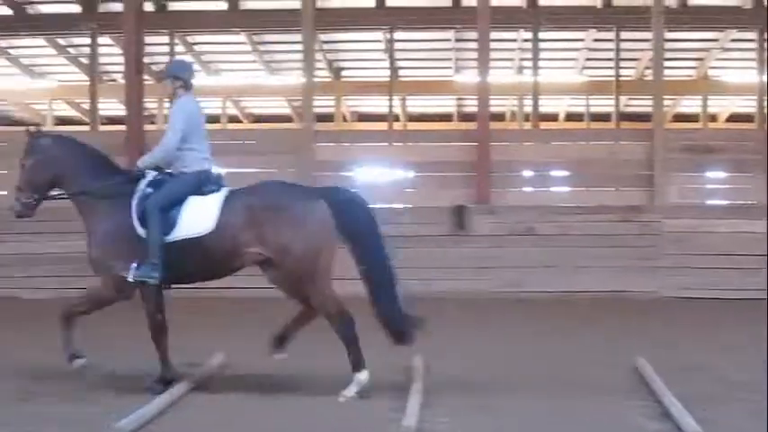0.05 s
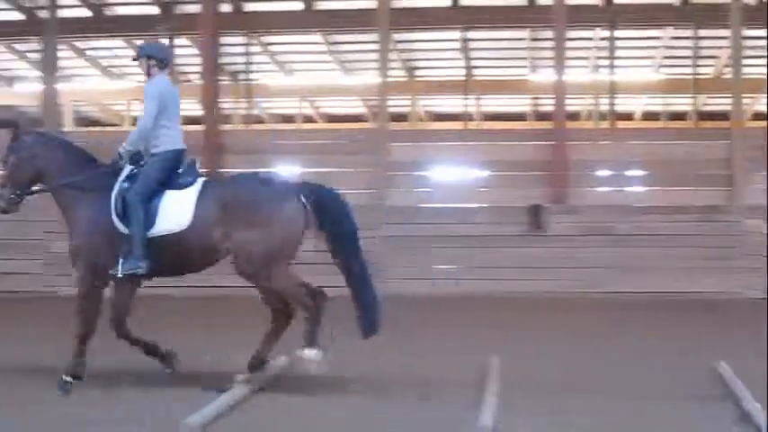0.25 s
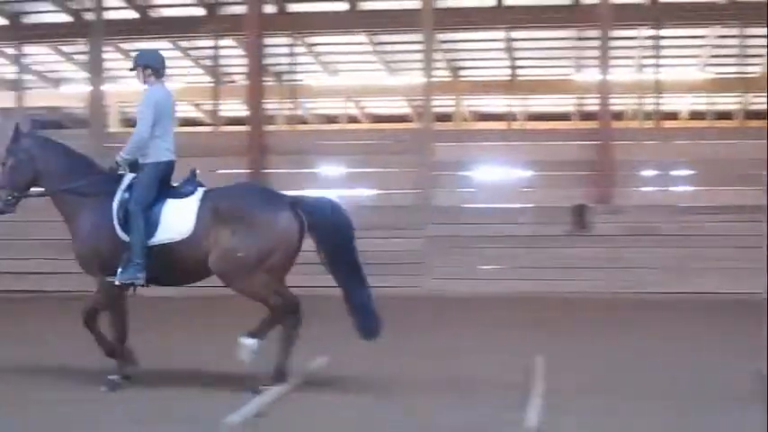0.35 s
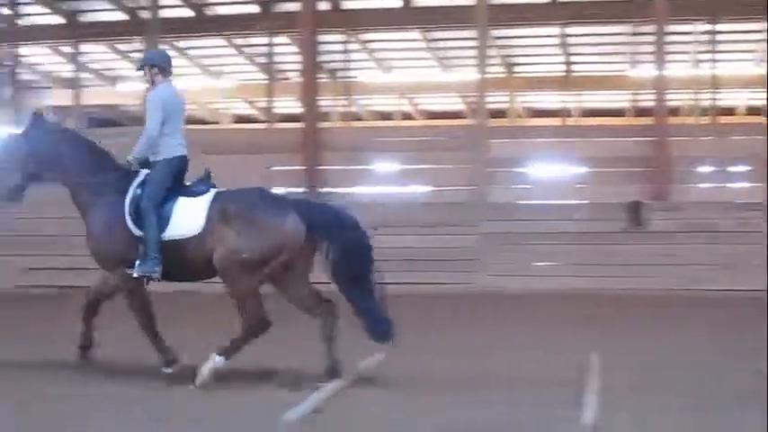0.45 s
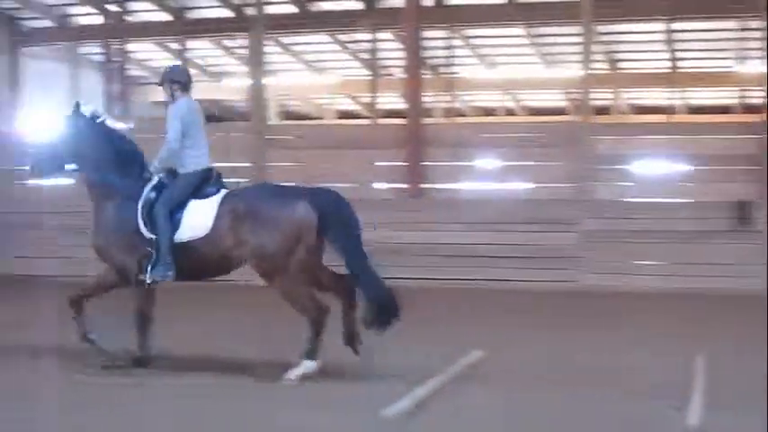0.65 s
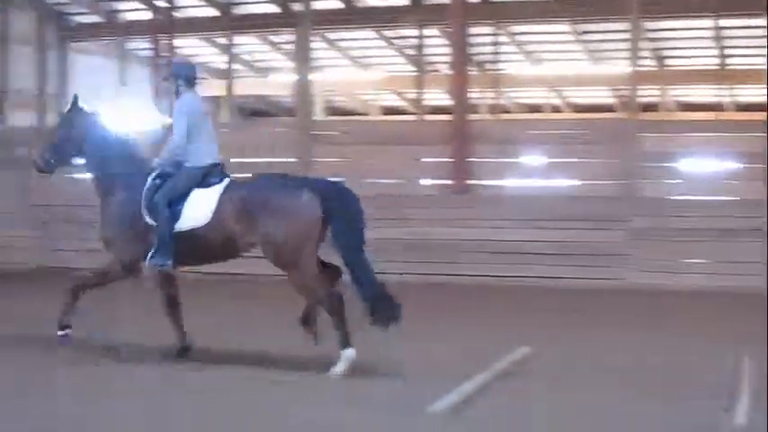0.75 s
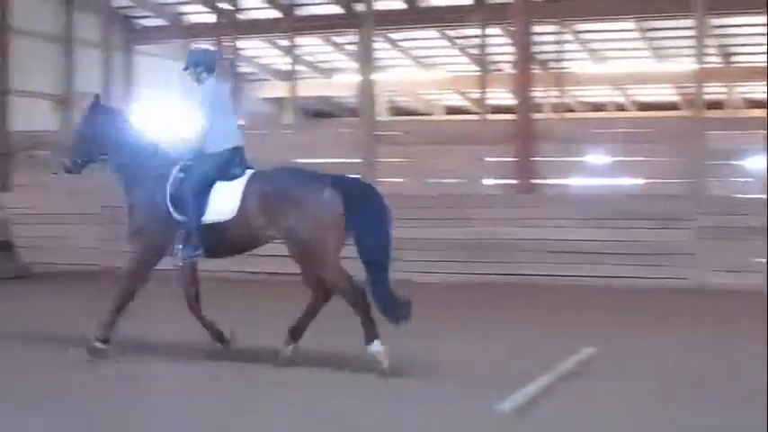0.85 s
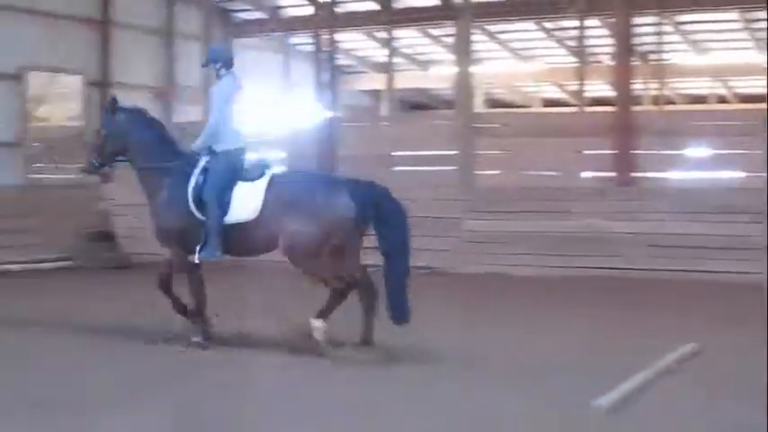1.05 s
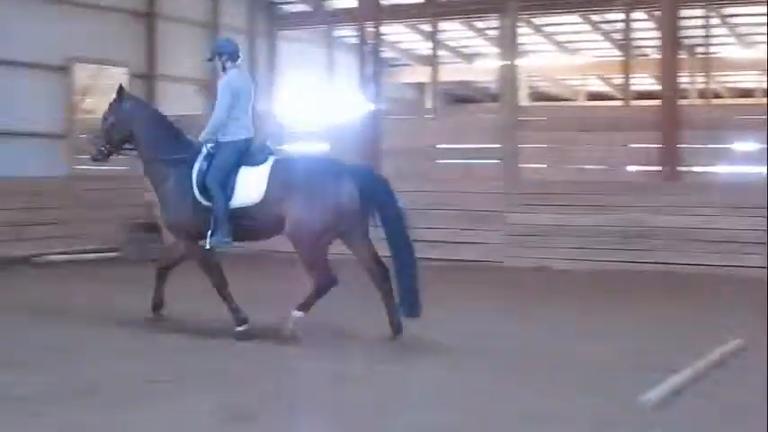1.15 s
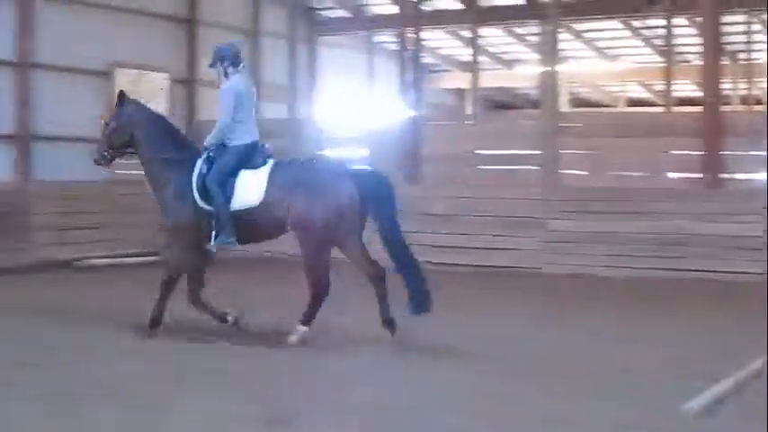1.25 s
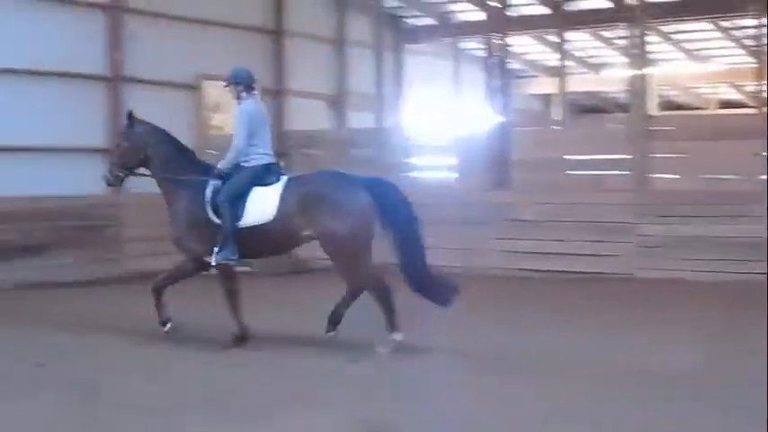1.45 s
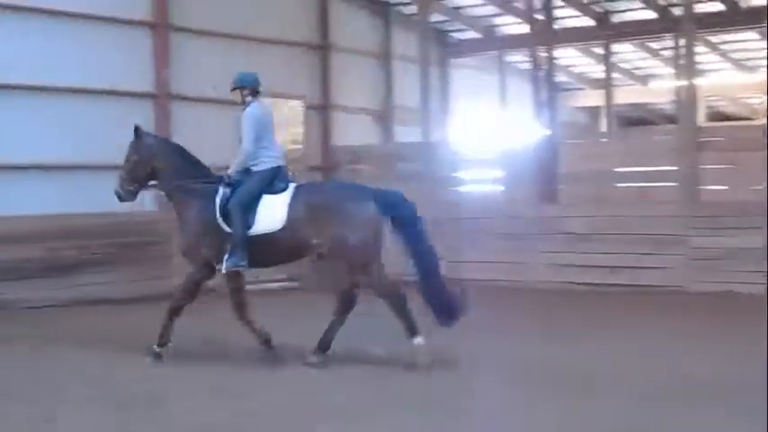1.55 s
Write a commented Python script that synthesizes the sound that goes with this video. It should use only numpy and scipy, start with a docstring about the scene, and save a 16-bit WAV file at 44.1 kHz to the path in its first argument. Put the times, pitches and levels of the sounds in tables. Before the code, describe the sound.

A hoof thuds and cracks against a wooden pole indoors, among dull steps in sand.

```python
"""A wooden thud and crack: a trotting horse knocks a ground pole in an indoor arena.
The impact excites the pole's modes; it bounces, rocks to rest, and its notes hang in the hall.
Soft footfalls and scuffs of sand, both bursts of noise, follow over a low hum,
faint room noise and distant, smeared squeaks."""
import sys
import numpy as np
from scipy import signal
from scipy.fft import rfft, irfft
from scipy.io import wavfile

SR = 44100
rng = np.random.default_rng(int(sys.argv[2]) if len(sys.argv) > 2 else 0)


def file_out(sig):
    """Save sig as 16-bit WAV at sys.argv[1]."""
    # one column per channel
    cols = np.atleast_2d(sig).T
    # limit, then scale
    lim = np.clip(cols, -1, 1)
    pcm = np.round(lim * 32767).astype(np.int16)
    wavfile.write(sys.argv[1], SR, pcm)


N = 70560

# blows on the pole: start_s, thud_db, ring_db
POLE_BLOWS = [(.2418, -9, -26.5), (0.2488, -9.5, -31.5), (0.2645, -16, -29.5), (0.2747, -20, -32),
              (0.3154, -12.5, -35.5)]


def undb(db):
    """Amplitude ratio of a level in decibels."""
    return 10 ** (np.asarray(db) / 20)


def fade(start_s, t60_s, rise_s):
    """Damped envelope: a rise, then exponential decay by 60 dB in t60_s."""
    age = np.maximum(np.arange(N) / SR - start_s, 0)
    return (1 - np.exp(-age / rise_s)) * np.exp(-np.log(1000) * age / t60_s)


def unit_rms(x):
    """The signal scaled to an rms of 1."""
    return x / np.sqrt(np.mean(x ** 2))


def noise(gain):
    """Random-phase noise of rms 1 whose amplitude spectrum follows gain(hz)."""
    f = np.maximum(np.fft.rfftfreq(N, 1 / SR), 1)
    phases = np.exp(2j * np.pi * rng.random(len(f)))
    return unit_rms(irfft(gain(f) * phases, N))


def band(hz, width_hz):
    """Noise shaped by a steep resonance."""
    return noise(lambda f: 1 / (1 + ((f * f - hz * hz) / (f * width_hz)) ** 2))


def drift(rate_hz):
    """Slow random fluctuation: low-pass noise of rms 1."""
    return noise(lambda f: np.exp(-(f / rate_hz) ** 2))


def background():
    """The building's broadband noise, and hum tones under slow amplitude and phase modulation."""
    # room noise spectrum: frequency_hz, relative_density_db
    air_spectrum = [(15, -42.5), (25, -11.5), (53, -21.5), (76, -5.5), (109, -10.5), (235, -3.5),
                    (424, -14), (485, -20), (569, -12.5), (1260, -16.5), (1470, -22.5), (4570, -28.5),
                    (5600, -34.5), (7280, -73), (12300, -120)]
    # tones of the hum: pitch_hz, level_db
    hum_tones = [(85, -43.5), (128.5, -51.5), (242, -55)]
    t = np.arange(N) / SR
    air_hz, air_db = np.array(air_spectrum).T
    air = noise(lambda f: undb(np.interp(np.log(f), np.log(air_hz), air_db)))
    out = air * undb(-38 + 0.83 * drift(11))
    for hz, db in hum_tones:
        amplitude = np.sqrt(2) * undb(db - 0.73 * drift(4.6))
        out += amplitude * np.sin(2 * np.pi * hz * t + 0.51 * drift(3.8))
    return out


def squeaks():
    """Reverberation blurs far-off high notes into narrow noise bands with decaying tails."""
    # distant squeaks: start_s, length_s, pitch_hz, level_db
    notes = [(-.03, 0.046, 1148, -42), (0.028, .06, 1180, -53.5), (0.625, 0.073, 1320, -41.5),
             (0.77, 0.12, 1205, -43), (1.008, 0.027, 1230, -37.5), (1.075, 0.041, 1224, -40),
             (1.203, 0.039, 1260, -49), (1.325, 0.038, 1203, -46.5)]
    t, out = np.arange(N) / SR, 0
    t60_s = 0.69
    for start, length, hz, db in notes:
        swell = np.clip((t - start) / (length / 2), 0, 1)
        tail = np.exp(-np.log(1000) * np.maximum(t - start - length, 0) / t60_s)
        out += undb(db) * swell * tail * band(hz, width_hz=99)
    return out


def hall(x):
    """Reverberation: a diffuse field builds up and dies away, each band at its own rate."""
    # arena reverberation: centre_hz, relative_db, t60_s
    bands = [(70, -14, 0.7), (140, -7, 1.9), (293, -0.5, 1.3), (530, -0.5, 2.16), (895, -4, 1.83),
             (1600, -4, 1.84), (2960, -8, 1.3), (6100, -9.5, 0.35)]
    log_f = np.log(np.maximum(np.fft.rfftfreq(N, 1 / SR), 1))
    log_centres = np.log([row[0] for row in bands])
    white = rfft(rng.standard_normal(N))
    response, wet_db = 0, 1
    for share, (_, db, t60) in zip(np.eye(len(bands)), bands):
        echoes = irfft(white * np.interp(log_f, log_centres, share), N)
        env = fade(start_s=0.0027, t60_s=t60, rise_s=0.0054)
        response += undb(db) * echoes * env / np.linalg.norm(env)
    return undb(wet_db) * signal.fftconvolve(x, response)[:N]


def sand():
    """Sand kicked up by the hooves: many tiny impacts merge into bursts of high noise."""
    # sprays and small ticks: start_s, level_db, t60_s
    scuffs = [(0.176, -47, 0.017), (.404, -40, 0.15), (.432, -50, 0.12), (0.563, -34, 0.024),
              (0.5762, -32.5, 0.025), (0.994, -39, 0.15), (1.054, -38, .02), (1.139, -38.5, 0.14),
              (1.273, -39.5, 0.046), (1.418, -37.5, 0.039)]
    env = sum(undb(db) * fade(start, t60, rise_s=t60 / 20) for start, db, t60 in scuffs)
    return band(hz=3460, width_hz=2300) * env


def footfalls():
    """Soft footing cushions each hoof's impact, leaving a dull, low thump."""
    # hooves landing in sand: start_s, level_db
    steps = [(.002, -26), (0.38, -22.5), (0.582, -18.5), (0.643, -20.5), (1.336, -34.5), (1.371, -32.5)]
    env = sum(undb(db) * fade(start, t60_s=0.074, rise_s=0.0037) for start, db in steps)
    return band(hz=272, width_hz=610) * env


def pole_rumble():
    """The pole rocks to rest in the sand; fast amplitude modulation makes its rumble rough."""
    rough = unit_rms(band(hz=310, width_hz=210) * undb(3 * drift(60)))
    return undb(-20) * rough * fade(start_s=0.3, t60_s=1.0, rise_s=0.09)


def pole_ring():
    """Every blow feeds the pole's bending modes, which waver as overlapping echoes interfere."""
    # bending modes as the hall sustains them: pitch_hz, relative_db, t60_s
    modes = [(244.3, -1, 1.2), (356.6, -3, 1.52), (500, -6, 2.0), (556, -10, 0.85), (649, -9, 0.89),
             (808, -7.5, 1.2), (815, -6, 1.2), (973, -17, .9), (1347, -11.5, 0.35), (1620, -22.5, 0.4),
             (2040, -16.5, 0.22)]
    age = np.arange(N) / SR - POLE_BLOWS[0][0]
    out, waver_hz = 0, 26.7
    for hz, db, t60 in modes:
        energy = sum((undb(ring_db) * fade(start, t60, rise_s=0.0036)) ** 2
                     for start, _, ring_db in POLE_BLOWS)
        waver = 1 + 0.64 * (drift(waver_hz) + 1j * drift(waver_hz))
        tone = np.imag(waver * np.exp(2j * np.pi * hz * age))
        out += undb(db) * np.sqrt(energy) * tone
    return out


def hoof_cracks():
    """Brief contacts have broad spectra: noise bursts as the hoof strikes and slips."""
    # hoof wall on wood: start_s, level_db, centre_hz, width_hz, t60_s
    contacts = [(0.241, -14.5, 653, 690, 0.038), (0.246, -15.5, 2770, 2270, 0.0054),
                (0.2471, -23.5, 1826, 1770, 0.012), (0.2482, -16.5, 740, 885, 0.02),
                (0.2683, -23.5, 2090, 900, 0.034), (.2700, -17.5, 1250, 880, 0.022),
                (0.276, -14.5, 750, 487, 0.03), (0.2841, -33, 2600, 3000, 0.0093),
                (0.3153, -15.5, 701, 502, 0.041)]
    out = 0
    for start, db, hz, width_hz, t60 in contacts:
        env = fade(start, t60, rise_s=0.00074)
        burst = band(hz, width_hz) * env
        out += undb(db) * burst * np.linalg.norm(env) / np.linalg.norm(burst)
    return out


def pole_thuds():
    """Each blow excites heavily damped low modes; the thin pole radiates little deep bass."""
    # modes of hoof and pole on sand: pitch_hz, relative_db, t60_s
    modes = [(133, -16.5, 0.042), (191, -1.5, 0.072), (236.4, 2.5, 0.06), (325, -4.5, 0.065)]
    t, out = np.arange(N) / SR, 0
    for start, thud_db, _ in POLE_BLOWS:
        for hz, db, t60 in modes:
            tone = np.sin(2 * np.pi * hz * (t - start))
            out += undb(thud_db + db) * tone * fade(start, t60, rise_s=0.0023)
    return signal.sosfilt(signal.butter(2, 57, "high", fs=SR, output="sos"), out)


def scene():
    """Superposition of direct sound, reverberation and background in one channel."""
    impacts = pole_thuds() + hoof_cracks() + footfalls()
    spray = sand()
    reverberation = hall(impacts + undb(3.5) * spray)
    mix = impacts + spray + reverberation + pole_ring() + pole_rumble() + squeaks() + background()
    return mix[None]


def record(dry):
    """A steep low-pass filter cuts the treble."""
    cutoff_hz = 5550
    return signal.sosfilt(signal.butter(20, cutoff_hz, fs=SR, output="sos"), dry)


dry = scene()
out = record(dry)
file_out(out)
```